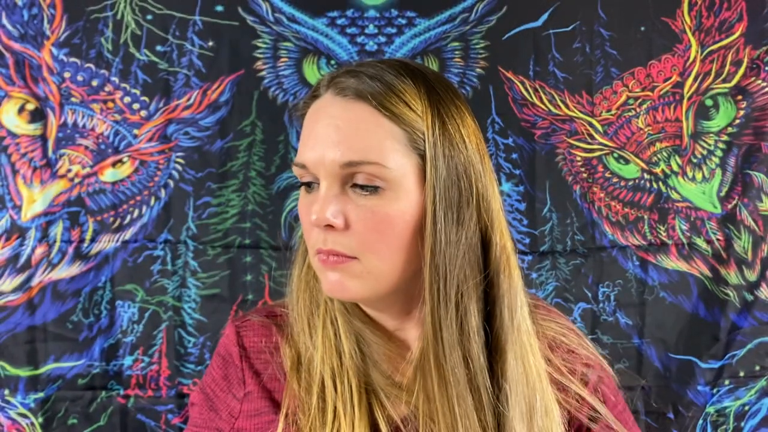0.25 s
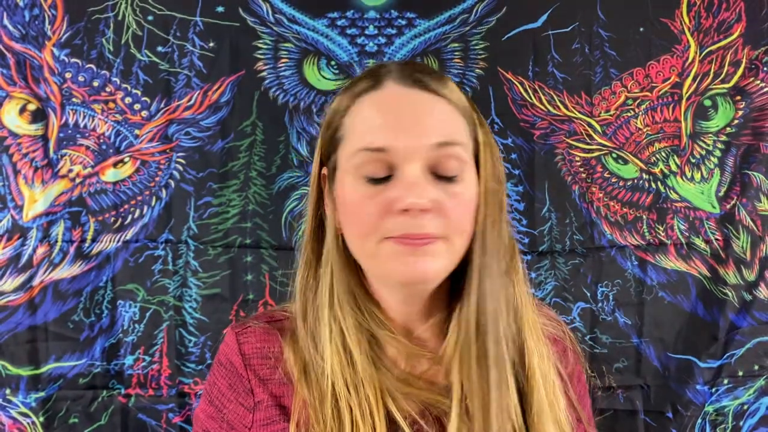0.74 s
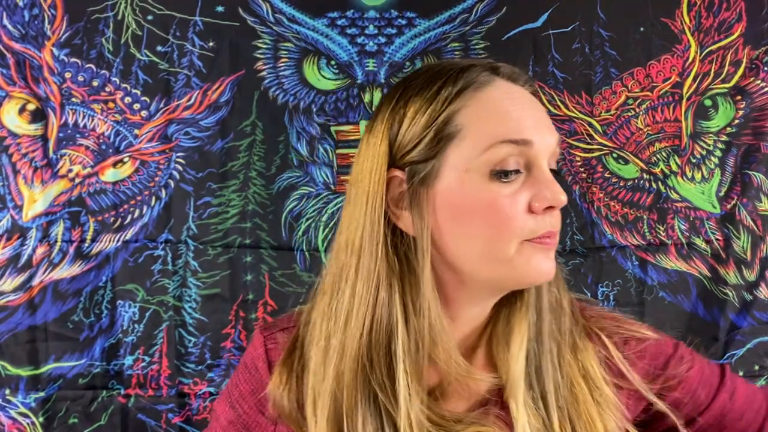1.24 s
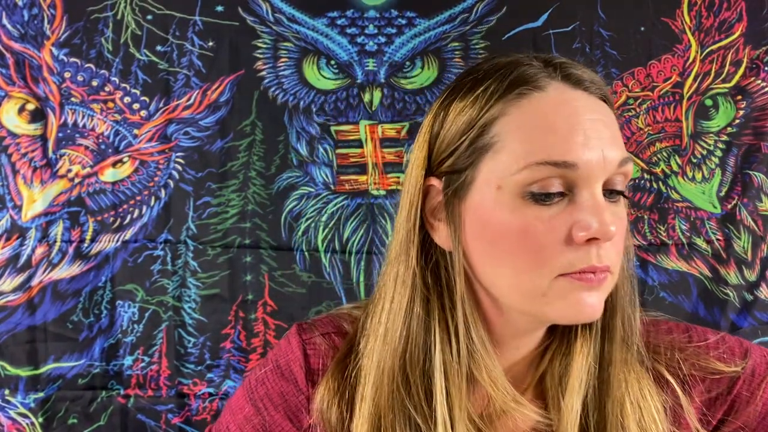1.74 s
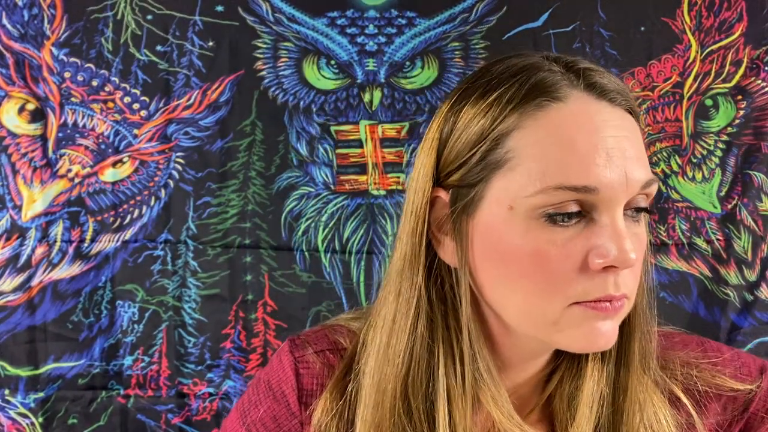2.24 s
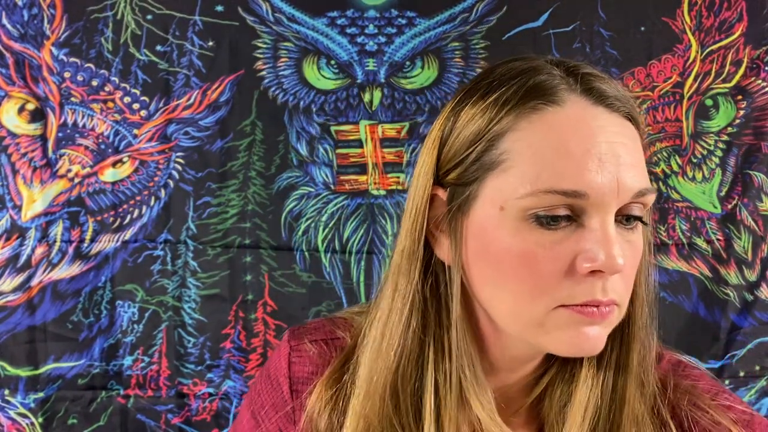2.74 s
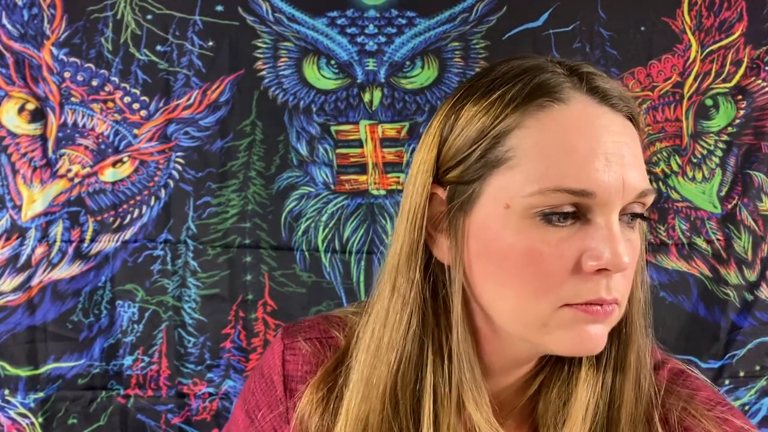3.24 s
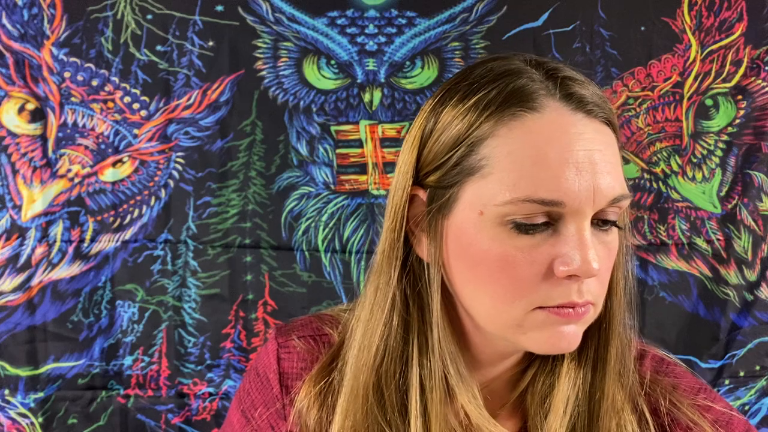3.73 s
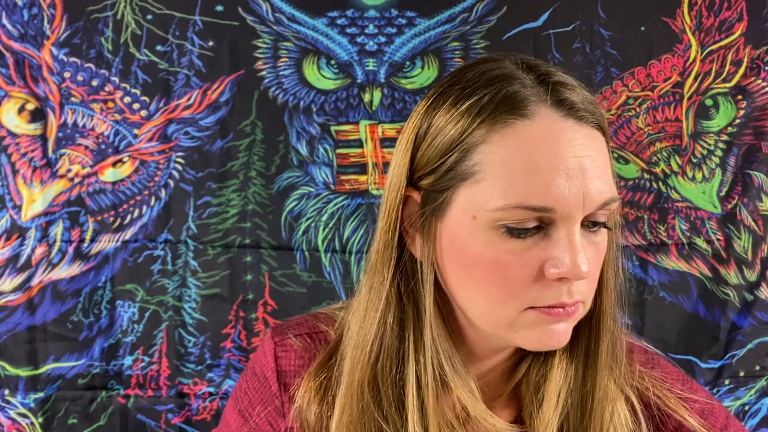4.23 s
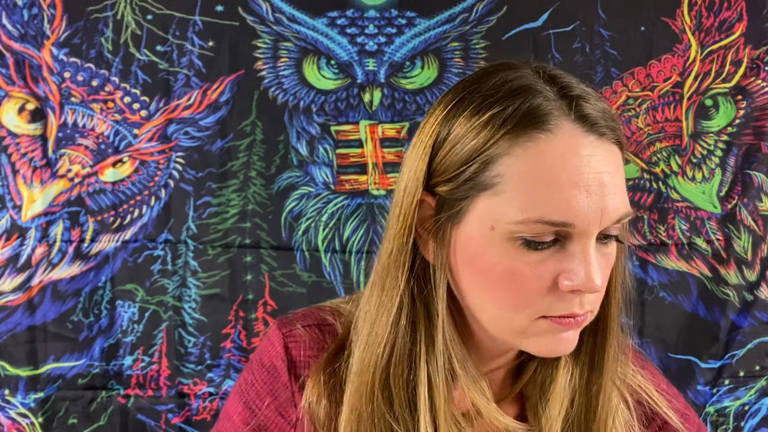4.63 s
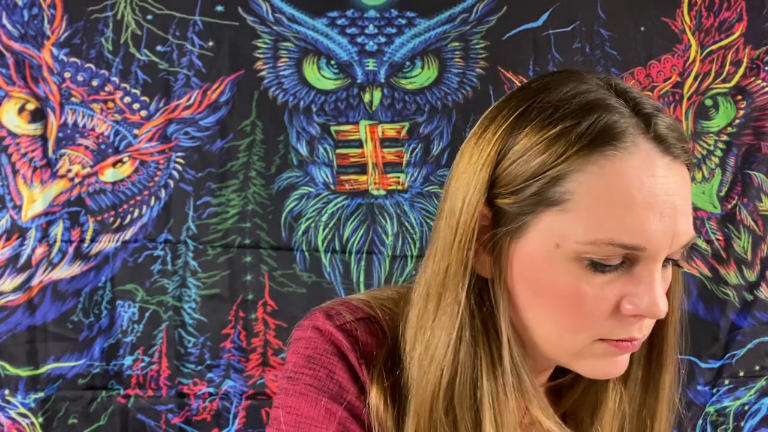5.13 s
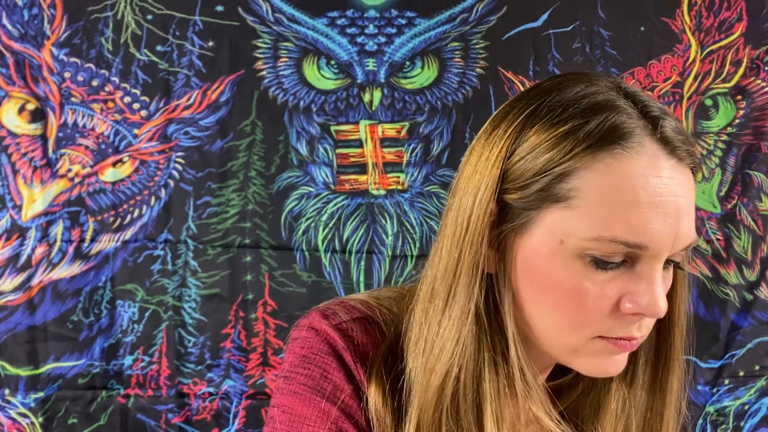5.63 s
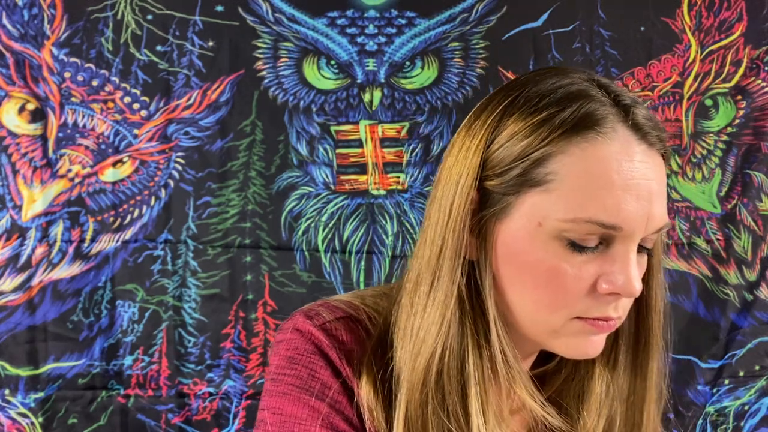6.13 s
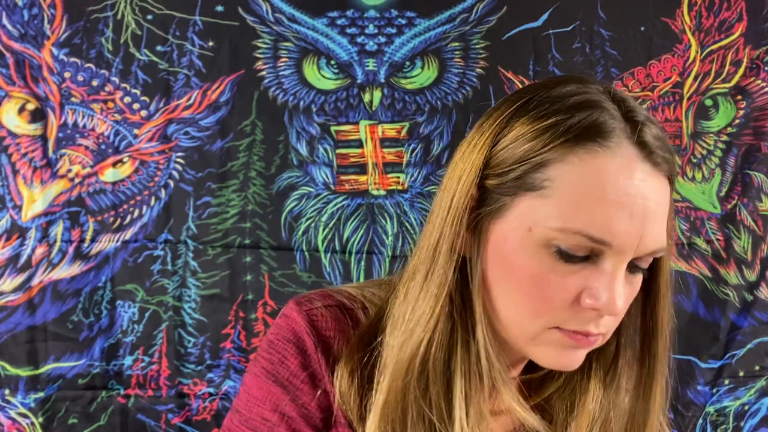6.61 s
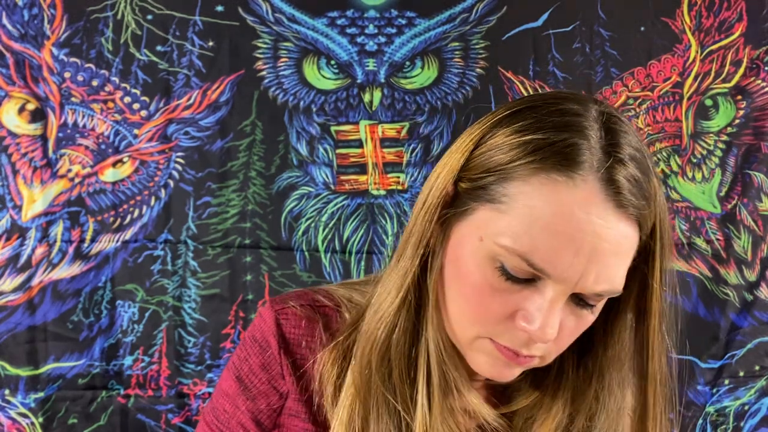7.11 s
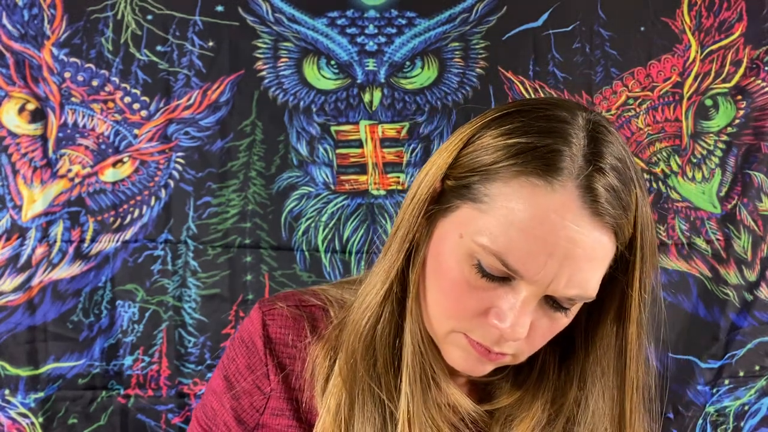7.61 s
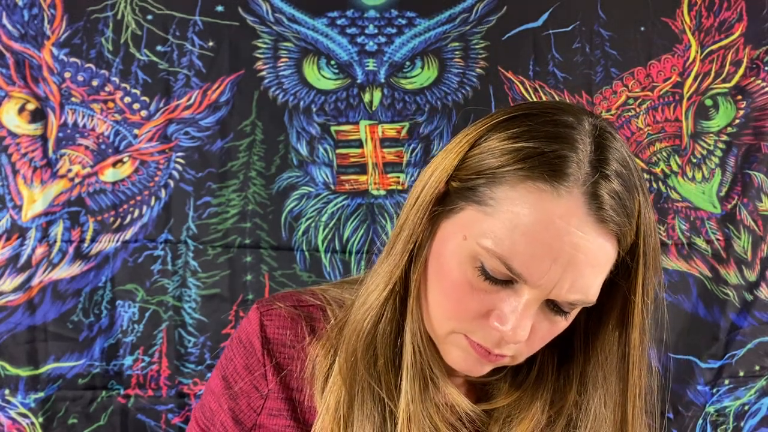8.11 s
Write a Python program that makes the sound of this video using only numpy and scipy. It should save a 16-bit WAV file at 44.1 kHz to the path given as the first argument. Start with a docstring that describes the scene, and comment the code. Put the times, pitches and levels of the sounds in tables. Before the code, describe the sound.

Close, quiet room: cloth rustling, small metal ticks, a hard hollow box clatter, one long scraping pull, rummaging, then a sharp brooch click.

```python
"""A box is knocked down, rummaged in and dragged about at a table in a small room: each knock is a
crack, ringing walls and a hollow boom; the dragging and shoving are stick-slip grains in resonances.
Metal brooches click and slide, pins tick, a hollow piece is tapped and tiny dry snaps sound: short
contacts or slips through resonances and filters. Sleeves and hair rustle in between as filtered grains,
over a low rumble, faint air and one soft bump. Table levels are relative, ahead of later trims."""
import sys
import numpy as np
from scipy import signal
from scipy.io import wavfile
from scipy.ndimage import map_coordinates

SR = 44100
rng = np.random.default_rng(int(sys.argv[2]) if len(sys.argv) > 2 else 0)


def to_wav(s):
    """Save 16-bit WAV."""
    ch = np.atleast_2d(s).T  # columns
    pcm = np.round(np.clip(ch, -1, 1) * 32767)  # PCM
    wavfile.write(sys.argv[1], SR, pcm.astype(np.int16))


N = 368676
TIME = np.arange(N) / SR
AGE = TIME[:SR // 3]  # time since a blow, in s


def amp(db):
    """Decibels to gain."""
    return 10 ** (np.asarray(db) / 20)


def unit(x):
    """Scales to rms 1."""
    return x / np.sqrt(np.mean(x ** 2) + 1e-20)


def at_level(x, db, size=900):
    """Sets the rms of the first 20 ms or so of a blow."""
    return amp(db) * x / np.sqrt(np.mean(x[:size] ** 2) + 1e-20)


def read(points, hz):
    """Reads a table on a log-frequency axis."""
    f, value = np.transpose(points)
    return np.interp(np.log(hz + 1), np.log(f + 1), value)


def add(mix, s, sound):
    """Mixes a sound in at time s."""
    part = mix[max(round(s * SR), 0):][:len(sound)]
    part += sound[:len(part)]


def fade(t60):
    """Exponential decay, falling 60 dB in t60 seconds."""
    return np.exp(-np.log(1000) * AGE / max(t60, .002))


def sine(hz):
    """A steady tone as long as a blow."""
    return np.sin(2 * np.pi * hz * AGE)


def colour(x, points, size=4096):
    """Causal filter with the given spectrum."""
    log_gain = np.log(amp(read(points, abs(np.fft.fftfreq(size, 1 / SR)))))
    taps = np.fft.ifft(np.exp(np.conj(signal.hilbert(log_gain)))).real
    return signal.oaconvolve(x, taps[:size // 2])[:len(x)]


def band(x, lo_hz, hi_hz, order=3):
    """Causal band-pass."""
    edges = [lo_hz, min(hi_hz, SR / 2 - 1)]
    return signal.sosfilt(signal.butter(order, edges, "band", fs=SR, output="sos"), x)


def brighten(x, db):
    """Lifts the treble against the mids."""
    return colour(x, [(1500, 0), (7000, db)])


def resonances(x, peaks):
    """Parallel resonances."""
    return sum(amp(db) * signal.lfilter(*signal.iirpeak(hz, hz / width, SR), x) for hz, width, db in peaks)


def ring(modes, detune=0.0067):
    """Dying modes; each blow lands on another spot and shares its force differently."""
    chance = rng.standard_normal((len(modes), 2))
    return sum(amp(db + 2 * a) * fade(t60) * sine(hz * (1 + detune * b))
               for (hz, db, t60), (a, b) in zip(modes, chance))


def contact(t60, chatter):
    """One sharp contact followed by dying chatter."""
    x = chatter * rng.standard_normal(len(AGE)) * fade(t60)
    x[0] -= 1
    return x


def spread(x, hz, width):
    """Bending waves travel at different speeds, so a sharp blow arrives as a short swing."""
    return x - 2 * resonances(x, [(hz, width, 0)])


def grains(per_s, spread_db):
    """Random tiny slips, a few of them large."""
    size = amp(spread_db * np.minimum(rng.exponential(1, N), 3.3))
    sign = rng.choice([-1, 1], N)
    return unit(size * sign * (rng.random(N) < per_s / SR))


def wobble(per_s):
    """Random curve: straight lines between normally drawn knots."""
    knots = np.arange(0, TIME[-1] + 1, 1 / per_s)
    return np.interp(TIME, knots, rng.standard_normal(len(knots)))


def patchy(x, patchy_db, per_s, width_hz):
    """The points of contact keep changing, and with them the bands that speak."""
    hz, t, z = signal.stft(x, SR, nperseg=512, noverlap=384)
    where = np.meshgrid(hz / width_hz, t * per_s, indexing="ij")
    field = map_coordinates(rng.standard_normal((128, 512)), where, order=1, mode="wrap")
    return signal.istft(z * amp(patchy_db * field), SR, nperseg=512, noverlap=384)[1][:N]


def strokes(rows, shape):
    """Gain over time of rows (start, length, dB): each rises, sags while the hand moves, and dies away."""
    rise_share, sag_db, release_t60 = shape
    power, t = np.zeros(N), TIME[:SR]
    for s, length, db in rows:
        rise = np.minimum(t / max(rise_share * length, .001), 1)
        sag = amp(db + sag_db * np.minimum(t / length, 1))
        release = np.exp(-np.log(1000) * np.maximum(t - length, 0) / release_t60)
        add(power, s, (rise * sag * release) ** 2)
    return np.sqrt(power)


# tilt of the rumble and air: (f/Hz, gain/dB)
AIR_COLOUR = [(10, 11.5), (25, 0), (40, -8.5), (60, -14.5), (100, -9), (140, -22), (220, -26.5),
              (500, -22.5), (1100, -47.5), (2500, -42.5), (6000, -41.5), (11000, -46), (16000, -45.5)]
# the stand's shakes, all cut off after a third of a second: (f/Hz, level/dB, t60/s)
STAND_MODES = [(23.9, -36.5, 1), (42, -34, 0.23), (78, -59, 0.064)]


def background():
    """Low rumble and faint air of the room; one soft bump reaches the microphone through its stand."""
    out = amp(-49.0) * unit(colour(rng.standard_normal(N), AIR_COLOUR))
    shudder = unit(band(rng.standard_normal(len(AGE)), 60, 123)) * fade(0.26)
    sway = sum(amp(db) * fade(t60) * sine(hz) for hz, db, t60 in STAND_MODES)
    sway = sway * signal.windows.tukey(len(AGE), .03)
    add(out, 2.912, sway + amp(-46) * shudder)
    return out


# sleeves and hair brush as the arm moves: (start t/s, length t/s, rub level/dB, fizz level/dB)
RUSTLE = [(0, 0.057, -47.5, -50.5), (0.163, 0.096, -55.5, -57.5), (0.304, 0.14, -53.5, -58),
          (0.413, 0.2, -53.5, -56.5), (0.596, .14, -55, -57), (0.766, 0.14, -52, -57),
          (0.947, 0.15, -54, -59), (1.108, 0.12, -50, -53), (1.232, 0.24, -62, -63.5),
          (1.478, 0.07, -68, -76), (2.293, 0.081, -57.5, -65.5), (2.373, 0.3, -55, -61.5),
          (2.543, 0.082, -47.5, -56.5), (2.68, 0.13, -48, -56), (2.878, 0.18, -54.5, -61.5),
          (3.344, .5, -49, -51.5), (4.816, 0.14, -52, -58.5), (4.874, 0.12, -46, -50.5),
          (5.016, 0.049, -41.5, -46.5), (5.07, 0.1, -56.5, -60.5), (5.203, 0.048, -43.5, -52),
          (5.22, 0.11, -43.5, -47.5), (5.37, 0.11, -50, -50.5), (5.542, 0.24, -53.5, -53),
          (5.803, 0.22, -54.5, -59.5), (5.982, 0.031, -40, -44.5), (6.113, 0.086, -55, -54.5),
          (6.326, 0.11, -59.5, -65), (6.494, 0.14, -59.5, -68.5), (7.26, 0.045, -61, -67.5),
          (7.492, 0.088, -52.5, -57), (7.6, 0.12, -58, -62), (7.71, 0.11, -51.5, -57.5),
          (7.802, 0.1, -53, -57.5), (7.902, .22, -61, -64.5), (8.165, 0.49, -52.5, -56.5)]
# a sleeve brushes the table, muffled: (start t/s, length t/s, level/dB)
BRUSHES = [(0, .06, -47), (.44, 0.024, -56.5), (.8, 0.14, -49.5), (1, 0.065, -52.5), (2.45, 0.047, -56.5),
           (2.705, 0.068, -53.5), (2.95, 0.084, -57), (5.21, 0.048, -55), (5.3, 0.12, -51),
           (5.97, 0.093, -55.5), (7.72, 0.12, -71)]
# a cloth stroke: (share of its length spent rising, sag over its length/dB, release t60/s)
CLOTH_STROKE = (.2, -2.5, 0.36)
# tone of the rub: (f/Hz, gain/dB)
RUB_COLOUR = [(60, -16), (170, -13), (260, -23), (500, -3), (700, -1), (920, 2), (1450, 1), (2200, -1),
              (3300, -4), (5000, -12.5), (8000, -27), (16000, -49)]
# tone of the fizz: (f/Hz, gain/dB)
FIZZ_COLOUR = [(60, -8), (2000, -22.5), (5000, 10), (7000, 8.5), (10000, 7.5), (13000, 2.5), (16000, -2.5)]
STILL_RUB_DB, STILL_FIZZ_DB = -65, -74  # cloth never quite rests
BRUSH_SHARE_DB = -15  # the muffled part of any rustle, against its rub
CLUMP_DB, CLUMPS_PER_S = 2.88, 59  # fibres slip in clumps
SNAGS_PER_S, SNAG_DB = 35, -8.5  # now and then a fibre catches and lets go


def rustle():
    """Fibres slip past each other in clumps: a rub, a fine fizz and a muffled brush from the same grains."""
    s, length, rub_db, fizz_db = np.transpose(RUSTLE)
    rub = np.hypot(strokes(zip(s, length, rub_db), CLOTH_STROKE), amp(STILL_RUB_DB))
    fizz = np.hypot(strokes(zip(s, length, fizz_db), CLOTH_STROKE), amp(STILL_FIZZ_DB))
    brush = np.hypot(strokes(BRUSHES, CLOTH_STROKE), amp(BRUSH_SHARE_DB) * rub)
    clumps = amp(CLUMP_DB * wobble(per_s=CLUMPS_PER_S))
    snags = amp(SNAG_DB) * grains(per_s=SNAGS_PER_S, spread_db=3.5)
    fibres = grains(per_s=3500, spread_db=2.0) * clumps + snags
    fibres = patchy(fibres, patchy_db=1.5, per_s=16, width_hz=570)
    return (rub * unit(colour(fibres, RUB_COLOUR)) + fizz * unit(colour(fibres, FIZZ_COLOUR))
            + brush * unit(band(fibres, 192, 703, order=2)))


# tone of a small hard contact: (f/Hz, gain/dB)
CLICK_COLOUR = [(60, -5), (150, -19), (250, -6), (700, -5.5), (1400, -1), (3400, -13.5), (5200, -13.5),
                (6200, -24.5), (10000, -27), (16000, -46.5)]


def strikes(rows, modes, ring_db, t60, chatter):
    """Small hard contacts that set a piece ringing."""
    out = np.zeros(N)
    for s, db, bright_db in rows:
        blow = at_level(colour(contact(t60, chatter), CLICK_COLOUR), 0) + at_level(ring(modes), ring_db)
        blow = brighten(blow, bright_db)
        add(out, s, amp(db) * blow / abs(blow).max())
    return out


# a brooch clicks on the table: (t/s, peak level/dB, treble lift/dB)
CLICKS = [(0.217, -33, -25.5), (6.7405, -18.5, -1.5), (6.7445, -18.5, -5), (6.8923, -28.5, 17),
          (6.897, -28, 0), (6.9687, -30.5, 37), (7.0, -29.5, 12)]
# ringing of the brooch: (f/Hz, level/dB, t60/s)
BROOCH_MODES = [(1340, -6.5, 0.022), (1900, -7.5, 0.027), (2074, -14, 0.059), (3320, -4, 0.014),
                (3420, -14, 0.024), (4250, -11, 0.012), (5170, -34, .012), (9750, -17.5, 0.0096)]


def brooch_clicks():
    """A hard contact with little chatter sets off the brooch's very short modes."""
    return amp(1.0) * strikes(CLICKS, BROOCH_MODES, ring_db=2.5, t60=0.019, chatter=0.048)


# tiny dry snaps: (t/s, peak level/dB, treble lift/dB)
SNAPS = [(0.245, -37, 16), (0.3213, -38, 8), (0.7157, -41, 8), (0.82, -36, 26), (0.8293, -30.5, 8),
         (0.899, -38, 26), (0.929, -38, 9), (1.0385, -31, -3), (1.0765, -36.5, 6), (4.508, -27, 0),
         (4.699, -24.5, 0), (5.0176, -33, 3), (5.038, -24, 6), (5.2323, -30, -4), (5.3235, -32, 2),
         (7.634, -44, -25), (7.7406, -43, -16), (7.7725, -38, -5), (7.8256, -41, -25), (7.832, -40.5, -16)]
# tone of a snap: (f/Hz, gain/dB)
SNAP_COLOUR = [(60, 4.5), (1500, 17), (5000, 3.5), (12000, -2.5), (16000, -13)]


def snaps():
    """Dry snaps: a filtered contact with a trace of chatter and no modes."""
    out = np.zeros(N)
    for s, db, bright_db in SNAPS:
        crack = contact(t60=.025, chatter=.04)
        snap = brighten(colour(crack, SNAP_COLOUR), bright_db)
        add(out, s, amp(db + 5.0) * snap / abs(snap).max())
    return amp(3.5) * out


# taps on a hollow piece that rings: (t/s, peak level/dB, treble lift/dB)
TAPS = [(.5843, -27, -9.5), (.848, -37, -8), (.8546, -29, -5), (.862, -25, -5), (.893, -31.5, -28),
        (.925, -37, -24), (.94, -40.5, -10), (6.534, -56, -20)]
# ringing of the hollow piece: (f/Hz, level/dB, t60/s)
HOLLOW_MODES = [(226, -6.5, 0.2), (389, -19.5, 0.34), (985, 1, 0.13), (1000, -2.5, 0.16),
                (1370, -10, 0.057), (1584, 2, 0.045), (2140, 5, 0.027), (2860, -9, 0.046)]


def hollow_taps():
    """A contact with long chatter sets off the hollow piece's longer modes."""
    return amp(3.5) * strikes(TAPS, HOLLOW_MODES, ring_db=3.5, t60=0.21, chatter=0.29)


# small pins tick against each other and against the box: (t/s, peak level/dB, f/Hz)
PINS = [(0.717, -31, 12900), (1.9978, -17.5, 2800), (2.006, -12, 2700), (2.0206, -26, 2700),
        (2.035, -27, 2950), (3.889, -36, 14300), (4.524, -34, 10600), (4.535, -37, 13000),
        (4.560, -37, 12000), (4.663, -25, 3600), (4.698, -30.5, 11500), (4.712, -36, 14100),
        (5.428, -38, 4520), (5.451, -28, 4400), (5.464, -40, 4540), (5.473, -28, 4340), (5.480, -35, 4530),
        (5.531, -30, 4470), (5.539, -18.5, 4230), (5.546, -35, 12800), (5.552, -25, 4260),
        (5.569, -31, 13800), (5.6, -30, 4040), (5.617, -23.5, 9500), (5.619, -27, 13600),
        (6.741, -19, 3500), (6.97, -32, 3970)]


def pin_ticks():
    """A pin rings for a few cycles, damped by its neighbours."""
    out = np.zeros(N)
    for s, db, hz in PINS:
        tick = resonances(contact(t60=0.0073, chatter=0.16), [(hz, 900, 0)])
        tick = resonances(tick, [(hz, 1800, 0)])
        add(out, s, amp(db) * tick / abs(tick).max())
    return out


# tone of a knock, shared with the buzzes: (f/Hz, gain/dB)
KNOCK_COLOUR = [(60, -35), (200, 11), (600, 11), (1300, 11.5), (2000, 0.5), (2900, -2.5), (3600, -8),
                (4600, -16.5), (6000, -29.5), (10000, -36), (16000, -46)]
# knocks of the box and of things in it:
# (t/s, strength level/dB, hardness/dB, wall f/Hz, hollow boom level/dB)
KNOCKS = [(1.6568, -36.5, 10.5, 634, -32), (1.677, -45.5, 14, 550, -36), (1.7393, -49.5, 15, 511, -72),
          (1.849, -41, 3, 1080, -65), (1.8905, -29, 3, 727, -49), (1.908, -28, 7, 750, -42),
          (1.963, -25.5, -1.5, 640, -36), (1.9756, -27, -10, 1060, -53), (1.997, -16, 0, 930, -15),
          (2.0039, -16.5, -5, 480, -20), (2.0204, -21, -10, 640, -50), (2.0381, -23, 5, 620, -27),
          (2.1101, -36.5, 5, 705, -39), (2.2215, -40.5, 9.5, 750, -56), (2.759, -44.5, -9, 530, -55),
          (2.819, -43, -1, 480, -71), (3.118, -56, -4, 442, -49), (3.2073, -38.5, 13, 950, -68),
          (3.296, -31.5, 16.5, 910, -51), (3.3188, -25.5, -12, 801, -33), (3.429, -32, -2, 590, -35),
          (4.141, -31, -2, 794, -33), (4.506, -44, 4, 694, -35), (4.6263, -27.5, 3, 970, -39),
          (4.7845, -37.5, 12.5, 910, -42), (4.791, -34.5, 15, 380, -45), (5.4364, -33, 14.5, 710, -58),
          (5.5396, -28, 9.5, 776, -29), (5.569, -37, 19, 824, -45), (5.6157, -34, -1, 480, -37),
          (5.6463, -39, 12.5, 510, -62), (5.701, -38, 10, 900, -68), (5.728, -42, 2, 480, -41),
          (5.7526, -41, 6, 1130, -63), (6.1718, -37.5, 6, 447, -63), (6.205, -51, 4, 600, -41),
          (6.2549, -40.5, 8, 730, -42), (7.047, -47, -16, 630, -41.5), (7.1588, -38.5, -5, 880, -65),
          (7.1633, -33, -31, 703, -38), (7.2125, -43.5, -28, 777, -41), (7.25, -51, -15, 720, -45)]
# ringing of the box: (f/Hz, level/dB, t60/s)
BOX_MODES = [(282, -38, .08), (390, -1, 0.27), (450, -17, 0.083), (620, 15, 0.06), (724, 13.5, 0.14),
             (1093, 14, 0.23), (1260, -28, 0.059), (1427, -16, 0.074), (1536, -24, 0.089),
             (1840, 12, 0.086)]
BOOM_HZ, BOOM_T60 = 230, 0.06  # the hollow boom; t60 in s
BOX_LOW_HZ = 182  # the box radiates little below its boom
KNOCK_T60 = 0.049  # dying chatter, s
# a harder blow moves its energy from the wall into the crack and the edge
CRACK_PER_HARDNESS, EDGE_DB = 0.41, -16.5
TICK_DB, TICK_GROWTH = -35, 0.63  # the metal's tick grows more slowly than the blow (dB per dB)


def knocks():
    """Each blow cracks, rings the wall that it lands on and starts the box's hollow boom."""
    out = np.zeros(N)
    for s, db, hard_db, wall_hz, boom_db in KNOCKS:
        crack = spread(colour(contact(KNOCK_T60, chatter=0.086), KNOCK_COLOUR), hz=1470, width=1450)
        body = at_level(crack, 0) + at_level(ring(BOX_MODES), -13.5)
        low, mid = band(body, 330, 1000, order=2), band(body, 1000, 2500, order=2)
        wall = at_level(low, 0) + at_level(ring([(wall_hz, 0, .04)]), 0.37)
        thud = at_level(wall, 0) + at_level(mid, CRACK_PER_HARDNESS * hard_db)
        air_swing = 1 - fade(0.052)  # the air inside takes a moment to swing
        boom = fade(BOOM_T60) * sine(BOOM_HZ) * air_swing
        edge = band(crack, 2500, 4860, order=4)
        tick = band(colour(contact(KNOCK_T60, chatter=0.67), KNOCK_COLOUR), 5600, 19000)
        tick_db = TICK_DB + TICK_GROWTH * (db + hard_db)
        parts = (boom, boom_db), (thud, db), (edge, db + hard_db + EDGE_DB), (tick, tick_db)
        add(out, s, amp(-4.5) * sum(at_level(x, part_db) for x, part_db in parts))
    return band(out, BOX_LOW_HZ, SR / 2)


# loose metal buzzes after some knocks: (t/s, level/dB)
BUZZES = [(1.657, -46.5), (1.6775, -55), (3.296, -48.5), (3.3203, -46.5), (5.6157, -40.5), (5.727, -49),
          (6.1712, -45.5), (6.204, -50.5)]


def buzzes():
    """Loose metal chatters briefly after a knock."""
    out = np.zeros(N)
    for s, db in BUZZES:
        chatter = colour(contact(t60=0.054, chatter=0.34), KNOCK_COLOUR)
        add(out, s, at_level(band(chatter, 7400, 19600), db))
    return out


# tone of the friction: (f/Hz, gain/dB)
SCRAPE_COLOUR = [(60, -9.5), (150, -27), (195, 3.5), (400, 1), (800, 1), (2000, 0.5), (3000, -7),
                 (4500, -13), (6300, -22), (10000, -27.5), (16000, -34)]
# resonances of the scraped box: (f/Hz, width f/Hz, level/dB)
SCRAPE_PEAKS = [(221, 15, 5), (307.4, 15, 1.5), (824, 160, -6.5), (1286, 16, -11), (1457, 50, 1),
                (1724, 68, -12.5), (4250, 320, -6.5)]


def scrape(slips, body_gain, boom_gain, edge_gain):
    """Stick-slip grains pass the box's resonances and split into boom, body and treble, each with its gain."""
    x = colour(slips, SCRAPE_COLOUR)
    x = x + resonances(x, SCRAPE_PEAKS)
    boom, body, edge = unit(band(x, 82, 432)), unit(band(x, 485, 2020)), unit(band(x, 2420, SR / 2))
    return body_gain * body + boom_gain * boom + edge_gain * edge


# short shoves of things inside the box:
# (start t/s, length t/s, friction level/dB, boom/dB and brightness/dB against the friction)
RUMMAGE = [(1.826, 0.026, -48.5, -12, -11), (1.85, 0.052, -41, -17, -13), (1.887, 0.031, -30.5, -14, -5.5),
           (2.045, 0.092, -42.5, -5, -8.5), (5.38, 0.038, -49.5, 1, -16), (5.508, 0.031, -48.5, 8, -4),
           (5.43, 0.056, -40, -0.5, -7), (5.53, 0.1, -37.5, -2, -5.5), (5.655, 0.095, -49, -20, -5),
           (6.098, .025, -51.5, -8, -4), (6.123, 0.11, -43, -2, -7.5), (6.253, 0.022, -43, -2.5, -7.5)]
# a shove: (share of its length spent rising, sag over its length/dB, release t60/s)
SHOVE_STROKE = (0.064, -4, 0.064)


def rummage():
    """Things are shoved about in the box in short, gritty strokes."""
    s, length, db, boom_db, bright_db = np.transpose(RUMMAGE)
    levels = (db, db + boom_db, db + bright_db)
    gains = (strokes(zip(s, length, level), SHOVE_STROKE) for level in levels)
    return amp(1.0) * scrape(grains(per_s=1600, spread_db=4.5), *gains)


# the box is dragged in one long pull:
# (t/s, effort level/dB, boom/dB and brightness/dB against the effort)
DRAG = [(3.17, -53.5, -15, -2), (3.2, -45.5, -14, -11), (3.26, -38, -18, -10.5), (3.32, -34, -4.5, -6.5),
        (3.56, -35.5, -4, -6.5), (3.87, -30.5, -7.5, -4.5), (4.25, -32.5, -12, -5.5),
        (4.52, -33.5, -6.5, -3), (4.7, -36.5, -15.5, -4.5), (4.829, -51, -4, -4.5)]
# the dragged box's moving resonance follows the contact: (t/s, f/Hz)
DRAG_RESONANCE = [(3.3, 566), (3.55, 610), (3.8, 865), (4.0, 878), (4.3, 840), (4.7, 860)]
SURGE_DB, SURGES_PER_S = 3, 12  # the boom swells as the box rocks


def drag():
    """The box is pulled along; its grip wavers and the contact colours the friction."""
    slips = grains(per_s=4200, spread_db=2.0) * amp(0.27 * wobble(per_s=35))
    slips = patchy(slips, patchy_db=2.6, per_s=22, width_hz=420)
    # shift the gliding pitch down to zero, smooth there, then shift back
    glide_hz = np.interp(TIME, *np.transpose(DRAG_RESONANCE))
    turn = np.exp(2j * np.pi * np.cumsum(glide_hz) / SR)
    width_hz = 220
    r = np.exp(-np.pi * width_hz / SR)
    moving = 2 * (turn * signal.lfilter([1 - r], [1, -r], slips / turn)).real
    s, effort_db, boom_db, bright_db = np.transpose(DRAG)
    effort = amp(np.interp(TIME, s, effort_db, left=-np.inf, right=-np.inf))
    surge = amp(np.interp(TIME, s, boom_db) + SURGE_DB * wobble(per_s=SURGES_PER_S))
    bright = amp(np.interp(TIME, s, bright_db))
    return effort * scrape(slips + amp(-5.0) * moving, 0.99, surge, bright)


# the fingers slide the brooch along: (start t/s, length t/s, level/dB)
SLIDE = [(6.748, 0.12, -60), (6.865, 0.11, -53), (6.96, 0.041, -39.5)]
# a slide: (share of its length spent rising, sag over its length/dB, release t60/s)
SLIDE_STROKE = (0.1, -3.5, 0.17)
# resonances of the sliding brooch: (f/Hz, width f/Hz, level/dB)
SLIDE_PEAKS = [(1300, 180, 10), (1970, 530, 7), (3180, 370, 2), (4020, 900, -31)]


def slide():
    """Fine slips ring the brooch as it is slid along."""
    slips = grains(per_s=2500, spread_db=5.0)
    sound = unit(resonances(slips, SLIDE_PEAKS)) + unit(colour(slips, CLICK_COLOUR))
    sound = patchy(sound, patchy_db=2.5, per_s=45, width_hz=730)
    return strokes(SLIDE, SLIDE_STROKE) * unit(sound)


# paths off the table and nearby things: (delay t/s, gain)
REFLECTIONS = [(.0035, 0.032), (.0069, -0.066), (0.0099, 0.1), (0.0165, -0.034)]


def nearby(x):
    """The first reflections comb the sound; soft furnishings take their treble."""
    out, dull = x.copy(), colour(x, [(1500, -3.5), (3500, -21), (9000, -40.0)])
    for delay, gain in REFLECTIONS:
        add(out, delay, gain * dull)
    return amp(-0.85) * out


# decay of the room's tail: (f/Hz, t60/s)
ROOM_T60 = [(100, 0.78), (230, 0.24), (1000, 0.25), (3500, 0.21), (8000, 0.33), (16000, 0.079)]


def room(x, wet_db):
    """A small furnished room: dense reflections whose decay time depends on pitch."""
    hz, t, z = signal.stft(rng.standard_normal(SR // 2), SR, nperseg=256)
    z = z * np.exp(-np.log(1000) * t / read(ROOM_T60, hz)[:, None])
    tail = signal.istft(z, SR, nperseg=256)[1][:len(AGE)] * (1 - fade(0.014))
    return x + amp(wet_db) * signal.oaconvolve(x, tail / np.linalg.norm(tail))[:N]


def scene():
    """All the handling in the room, with the snaps left dry, over the background."""
    box = knocks() + buzzes() + rummage() + drag()
    metal = brooch_clicks() + hollow_taps() + pin_ticks() + slide()
    handling = box + metal + rustle()
    return (room(nearby(handling), wet_db=-13.0) + snaps() + background())[None]


def record(dry):
    """The recorder's band limit, a steep low-pass at 16 kHz."""
    low_pass = signal.firwin(511, 16000, window=("kaiser", 9), fs=SR)
    return signal.oaconvolve(dry, low_pass[None], "same")


dry = scene()
out = record(dry)
to_wav(out)
```